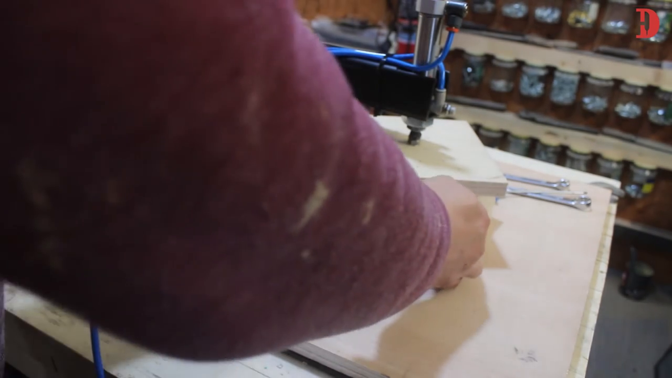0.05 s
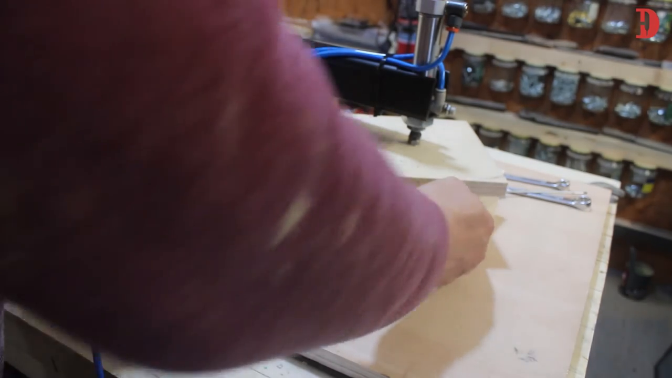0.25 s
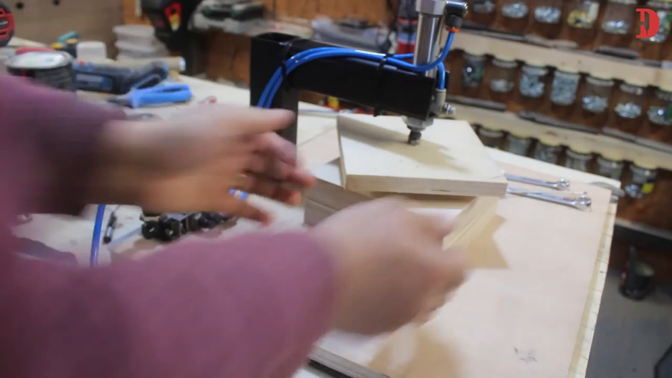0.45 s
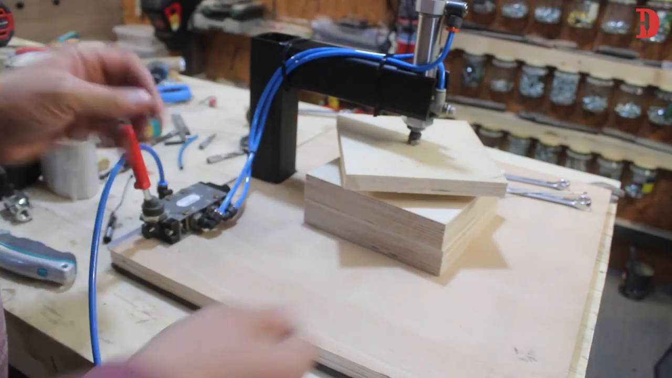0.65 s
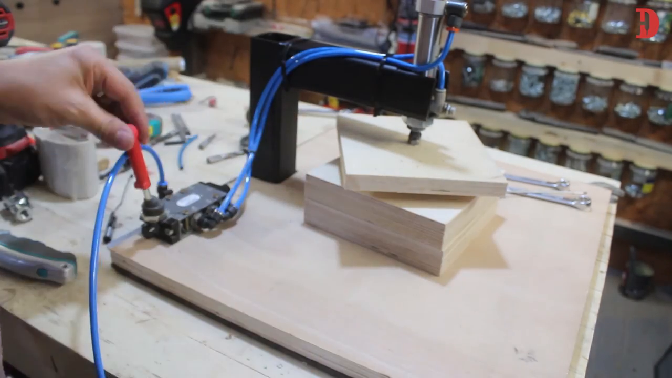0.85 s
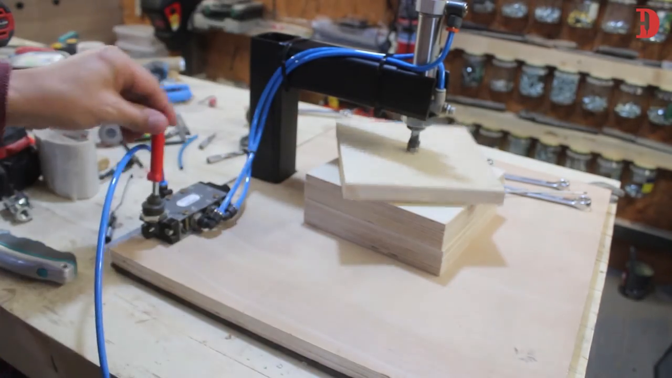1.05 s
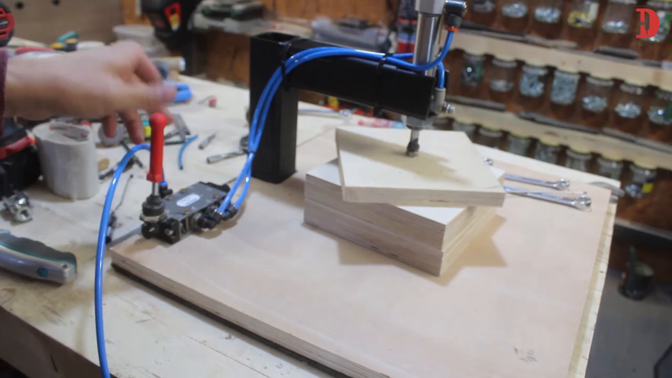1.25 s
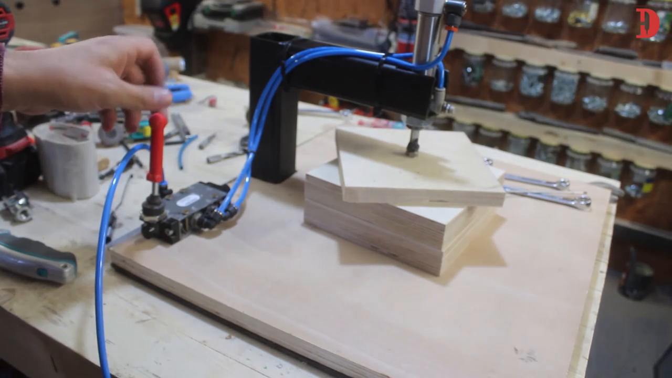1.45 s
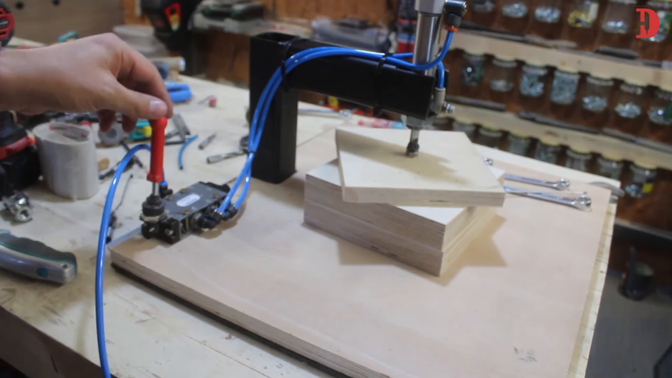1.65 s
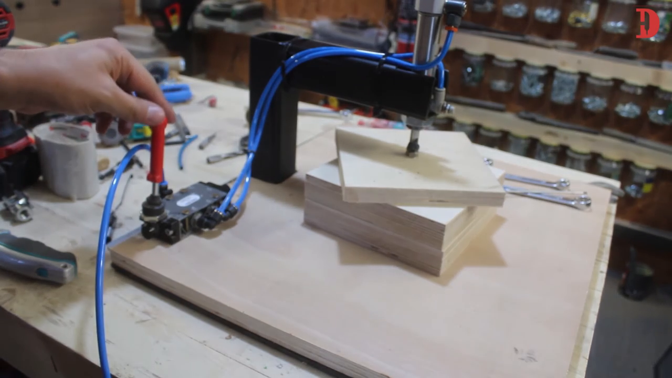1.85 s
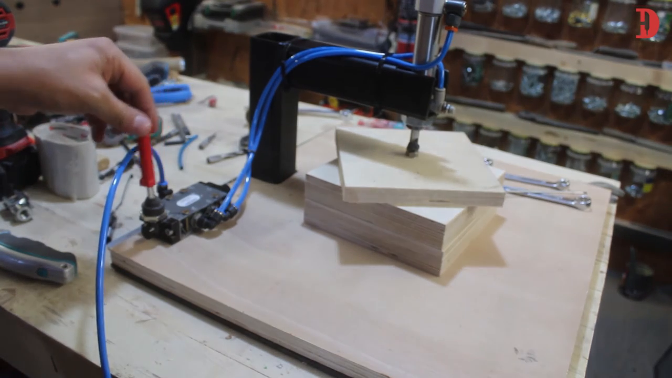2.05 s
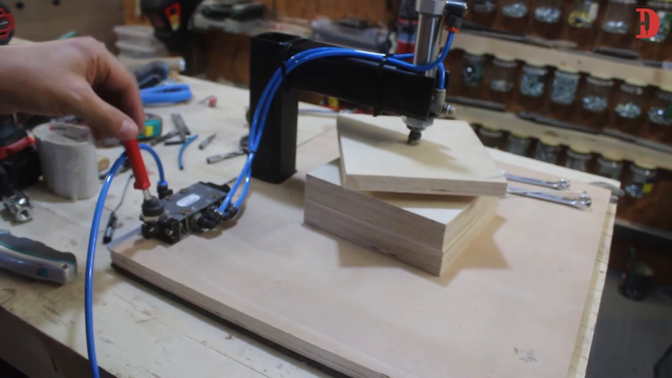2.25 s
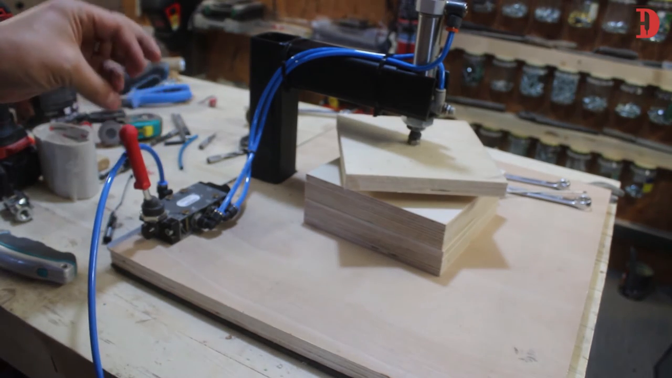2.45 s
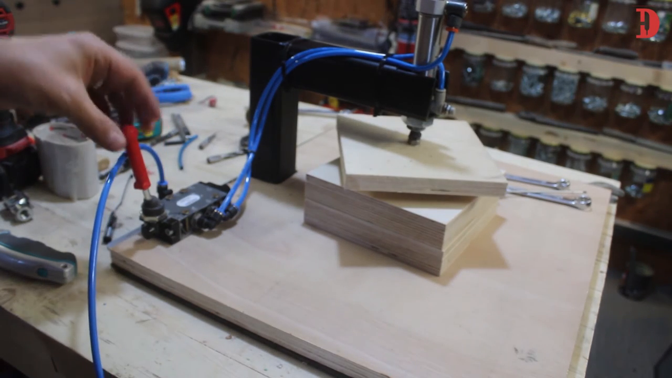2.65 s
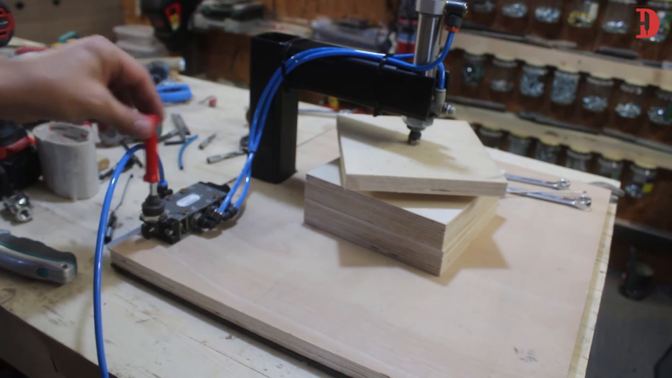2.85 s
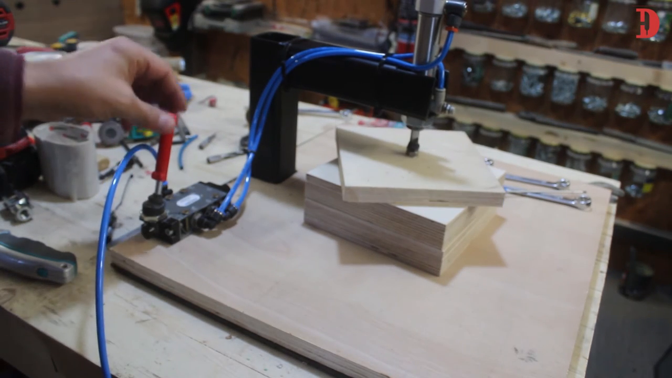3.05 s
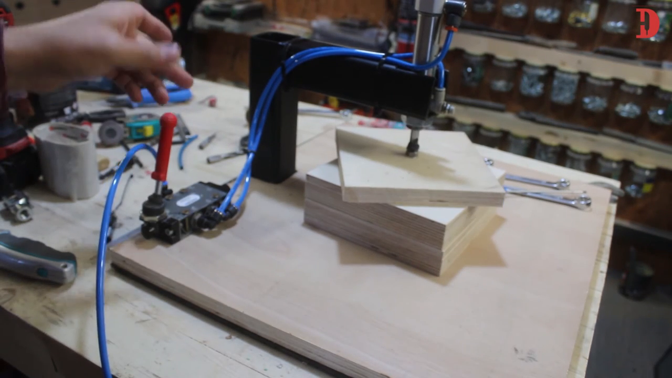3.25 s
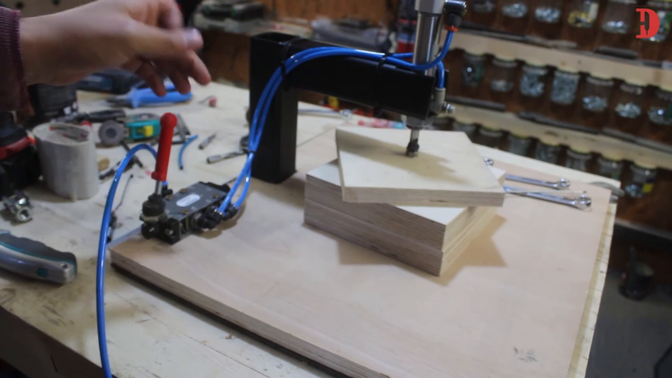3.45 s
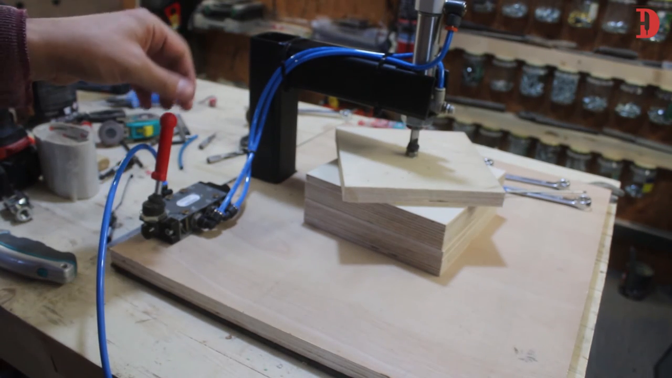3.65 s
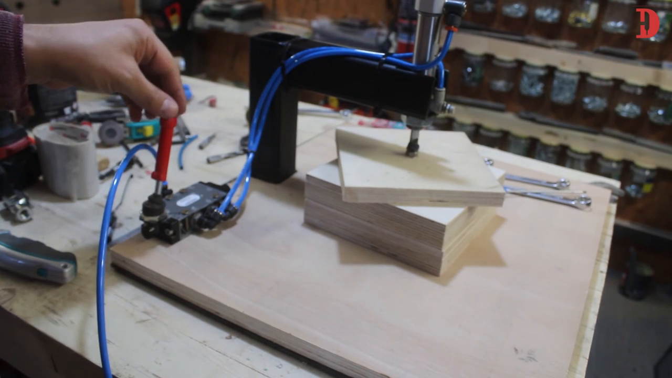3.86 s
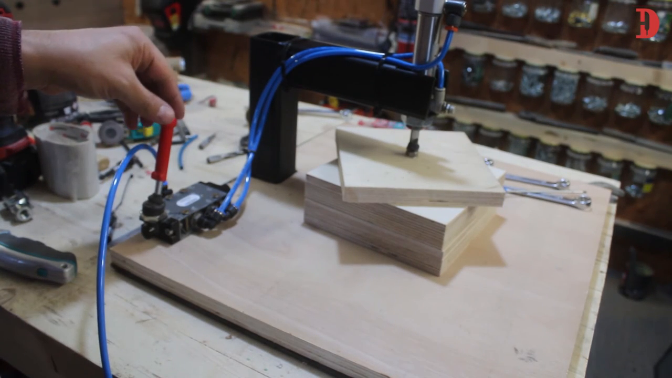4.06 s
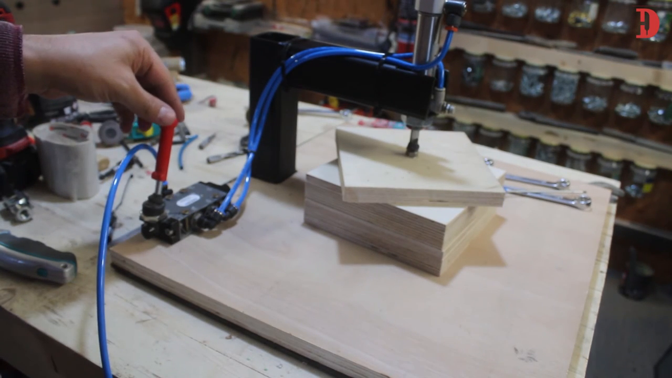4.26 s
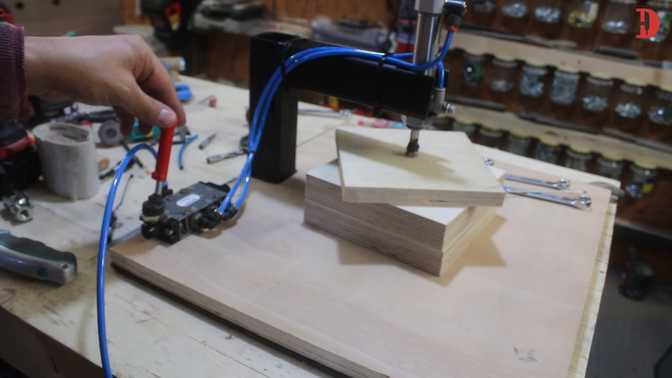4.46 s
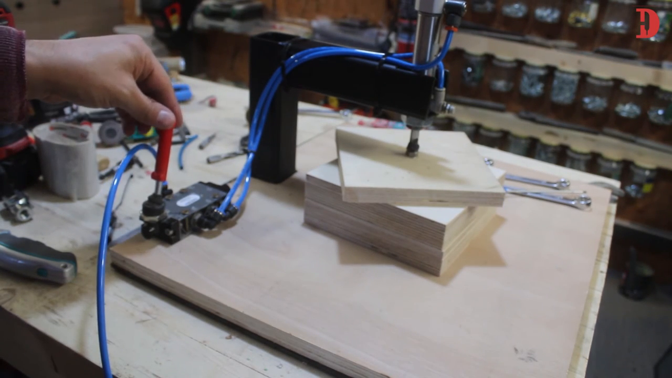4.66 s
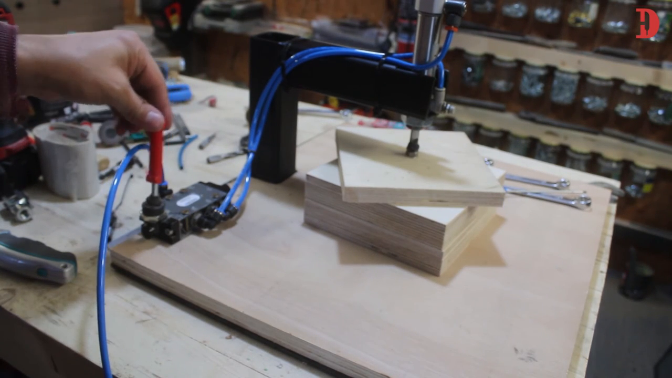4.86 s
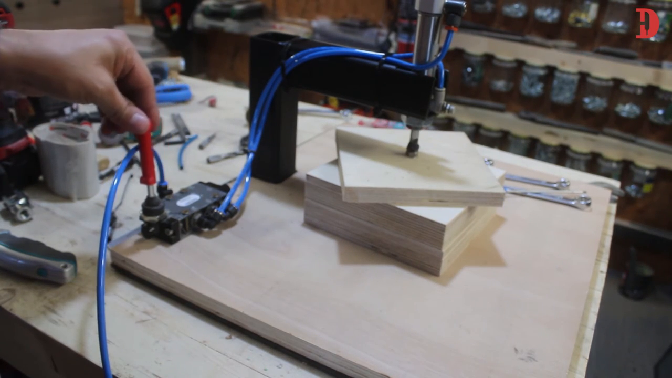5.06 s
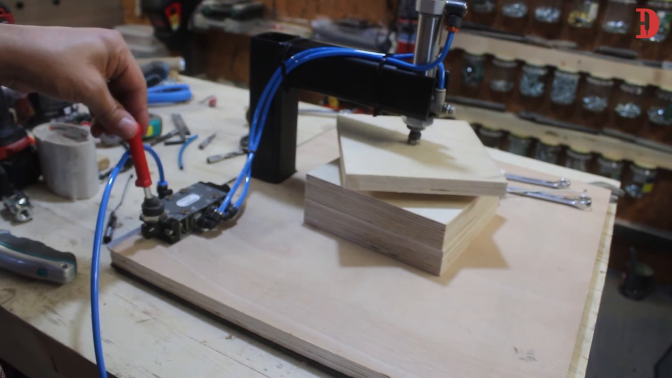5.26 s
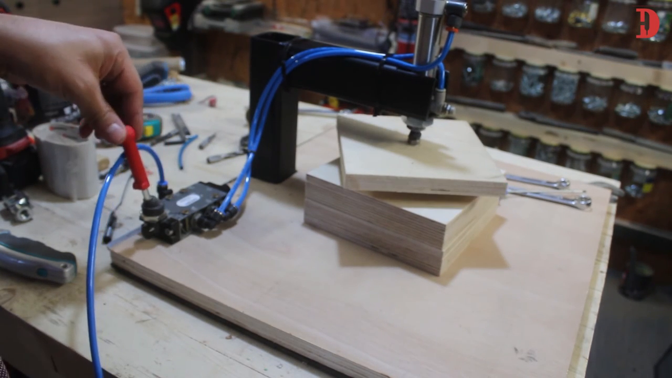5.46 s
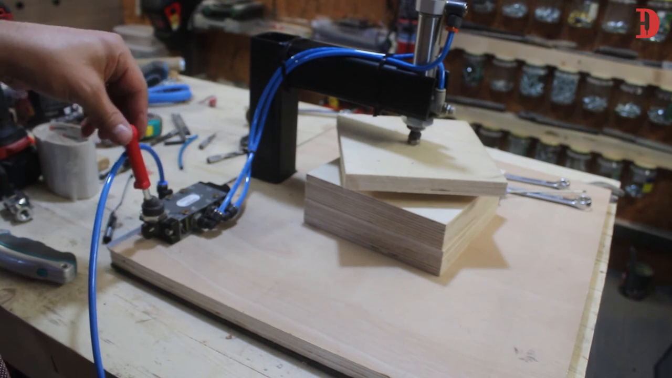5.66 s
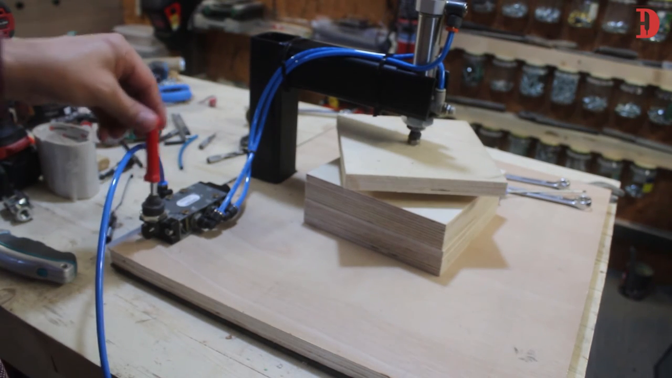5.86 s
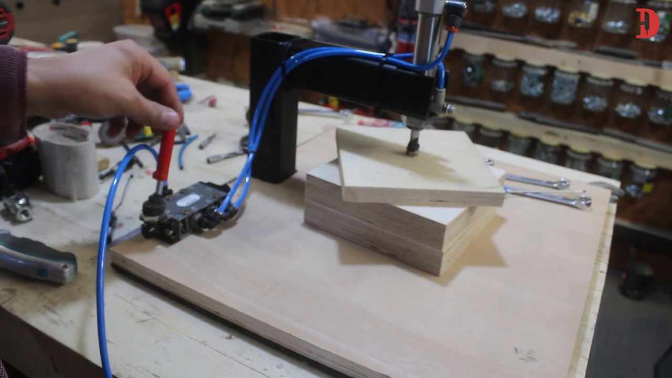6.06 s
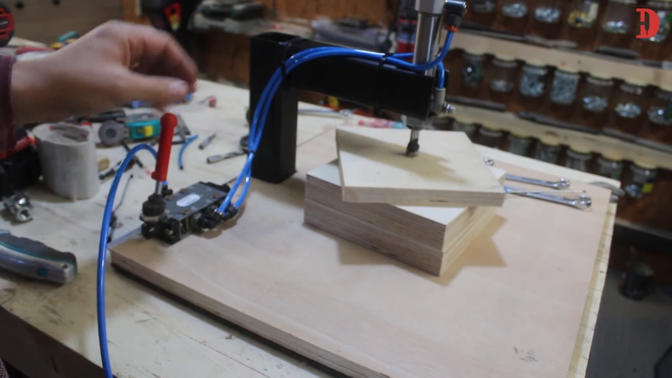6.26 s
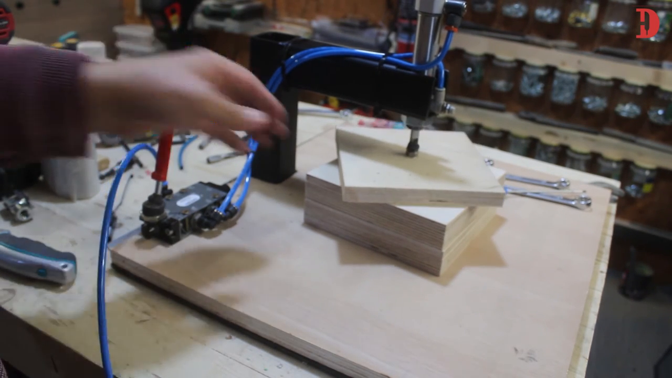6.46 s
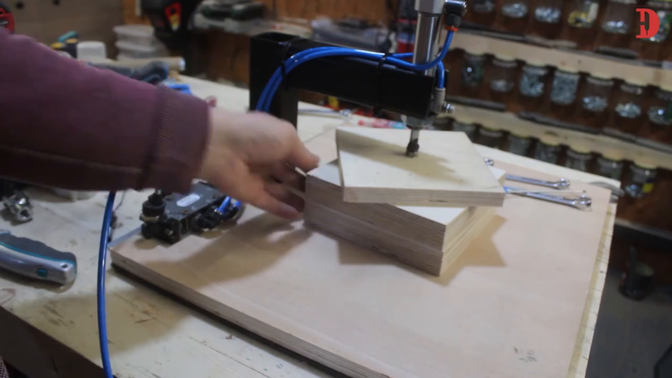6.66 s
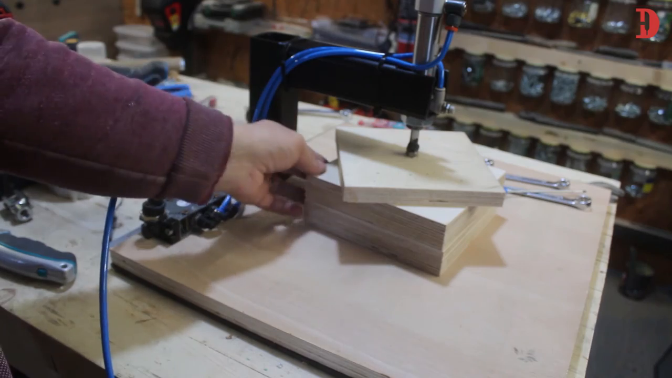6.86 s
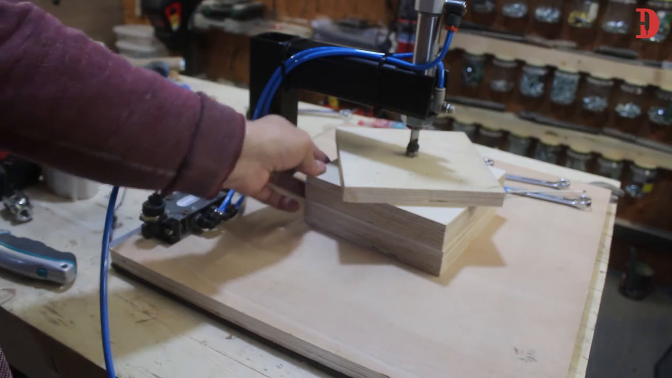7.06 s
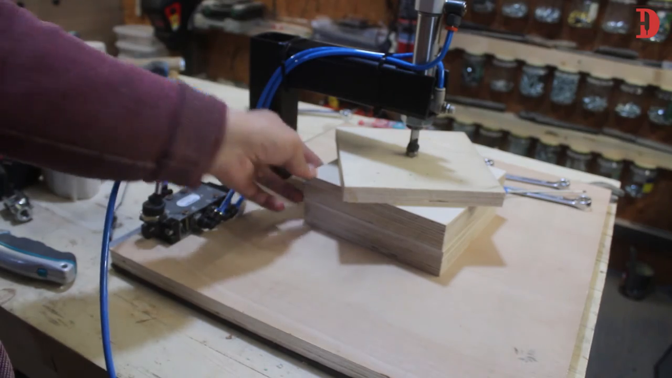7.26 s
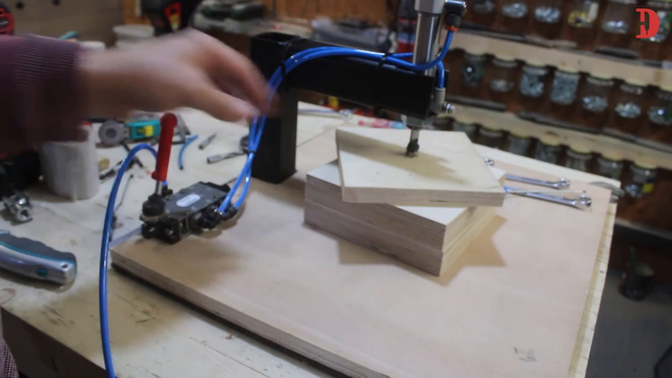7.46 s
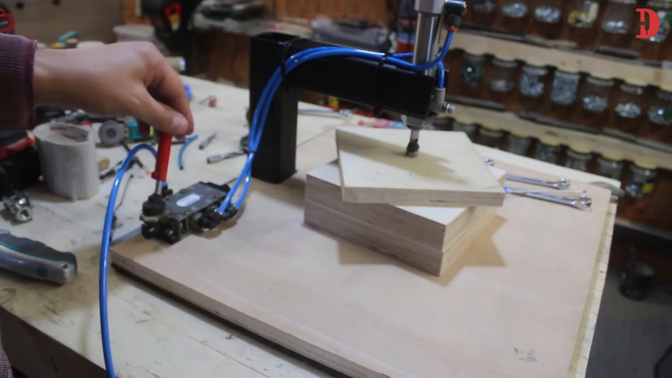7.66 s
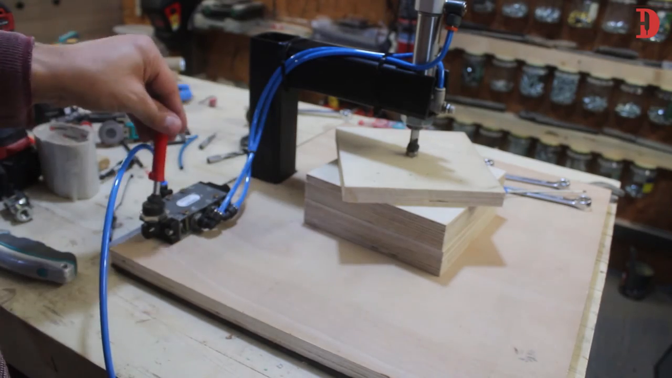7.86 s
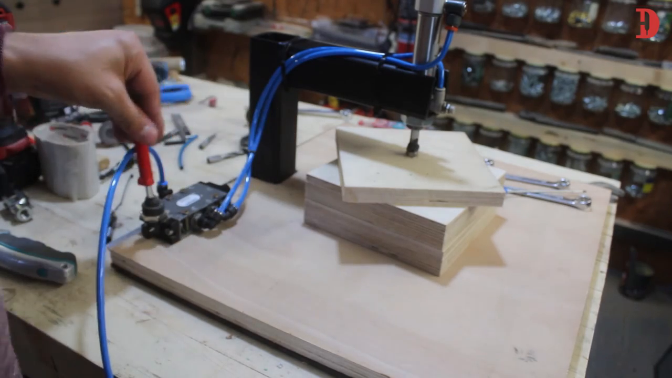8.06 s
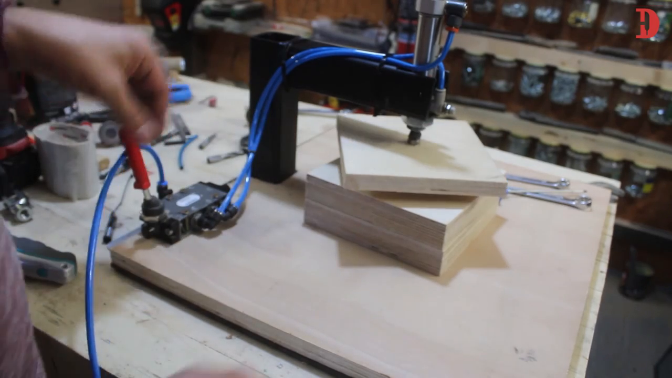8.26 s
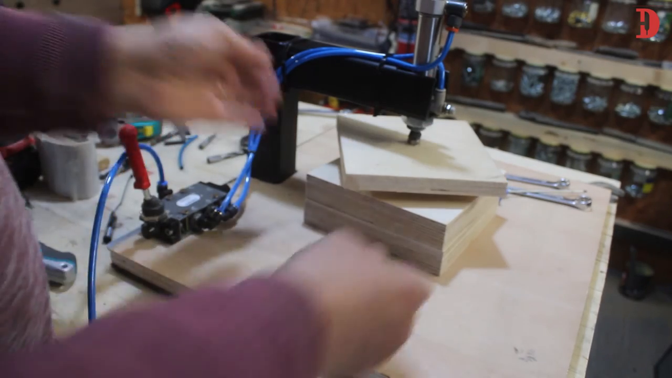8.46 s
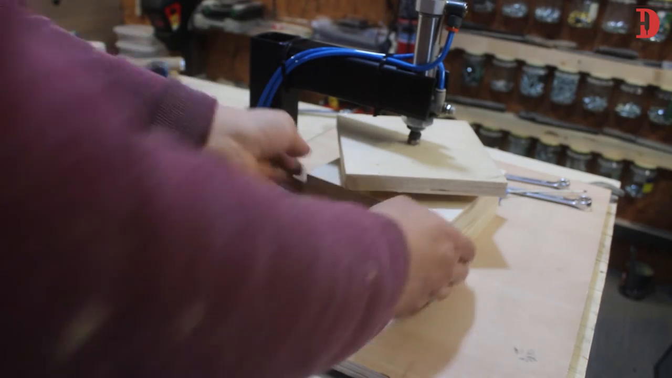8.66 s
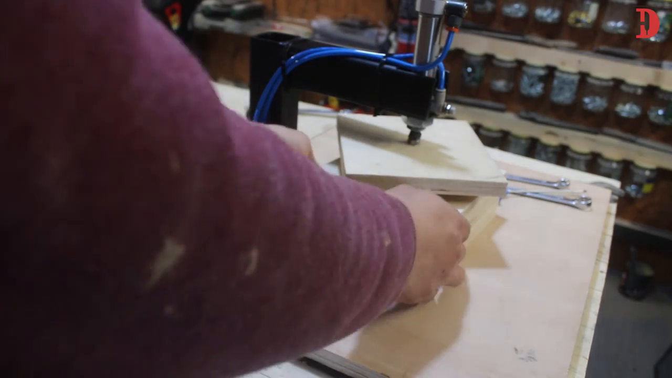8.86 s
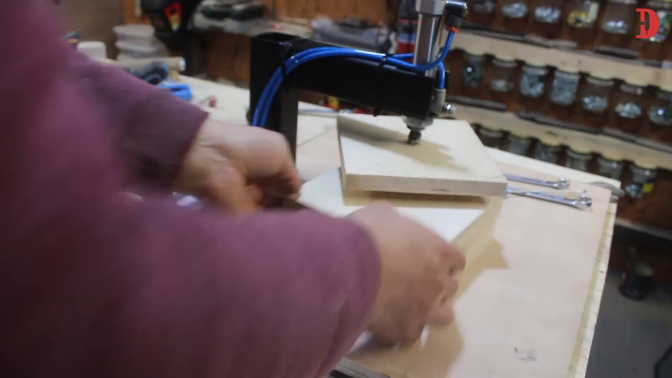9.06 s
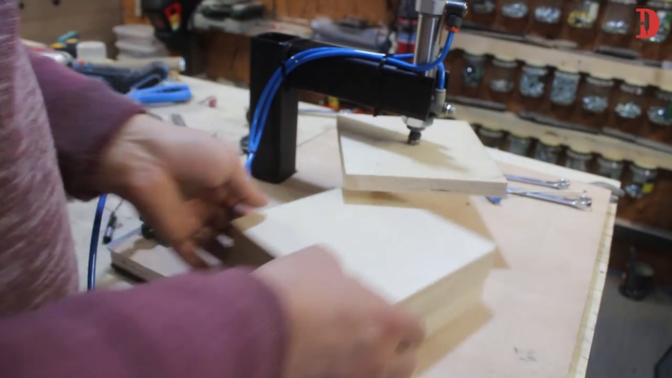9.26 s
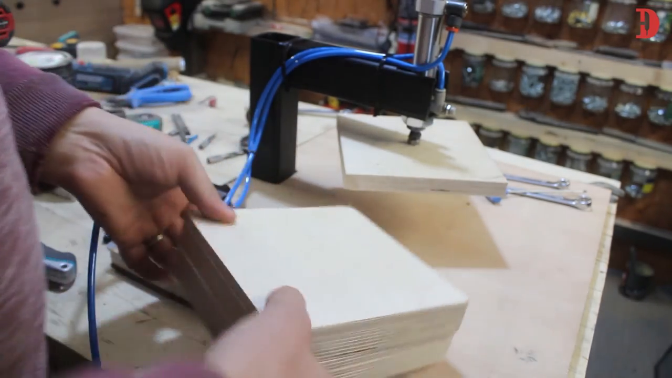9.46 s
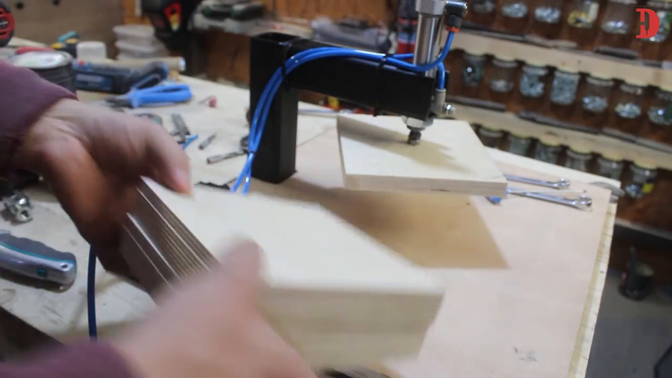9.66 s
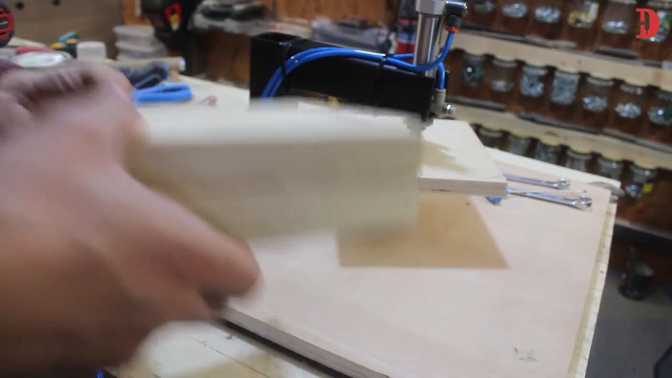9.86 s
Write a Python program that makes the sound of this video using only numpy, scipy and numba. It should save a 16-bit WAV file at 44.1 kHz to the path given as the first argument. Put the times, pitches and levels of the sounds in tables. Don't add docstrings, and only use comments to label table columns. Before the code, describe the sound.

Close on a workshop bench, a steady compressor motor drones behind a small air press. Its hand valve is thrown six times, alternating down and up: explosive air blasts, a popping hiss and dull plywood thud going down, then a hard slam against the stop with thin metallic ringing going up. Sleeve rustles and small ticks fill the gaps. At the end a wood block is dragged off with rough, stuttering scraping.

```python
import sys
import numpy as np
from scipy import signal
from scipy.fft import rfft, irfft
from scipy.io import wavfile
from scipy.ndimage import uniform_filter1d
from numba import njit

SR = 44100
rng = np.random.default_rng(int(sys.argv[2]) if len(sys.argv) > 2 else 0)


def materialize(psi):
    bounded = np.clip(np.atleast_2d(psi).T, -1, 1)
    quanta = np.round(bounded * 32767).astype(np.int16)
    wavfile.write(sys.argv[1], SR, quanta)


def how_loud(loudness_db):
    steps = np.asarray(loudness_db, float) / 20
    return 10 ** steps


N = 437472
TIME = np.arange(N) / SR

# start_s, shaft_hz
SHAFT_RATE = [(0, 56.85), (.45, 56.72), (1.65, 56.72), (2.7, 56.88), (4.6, 57.055), (5.1, 57.02),
              (6.5, 56.89), (7.7, 56.865), (8.6, 56.95), (9.92, 56.98)]
# multiple_of_shaft, level_db
MOTOR_ORDERS = [(1, -26), (2, -20.5), (3, 2), (4, -18), (5, -16.5), (6, -5), (7, -8), (8, -12), (9, -16),
                (10, -14.5), (11, -15), (12, -13), (13, -23.5), (14, -11), (15, -12), (16, -34), (17, -9.5),
                (18, -42.5), (27, -7), (28, -24.5), (29, -10), (30, -23)]
# multiple, rms_db, upright_db, leaning_db, aside_db
CASING = [(19, -52, -26.5, 7, -6), (20, -53, 2.5, 12, -3), (21, -49, 4, -5, 3), (22, -60.5, 10.5, 20, 2.5),
          (23, -57.5, -4.5, -24, 5), (24, -66, -9, 1, 2), (25, -54.5, 0.5, 3, 0), (26, -59, 2.5, -3, -2.5)]
# start_s, upright_0_1, leaning_in_0_1, stepped_aside_0_1
STANCE = [(0, 0.95, 0.14, 0), (.3, 0.64, 0.25, 0.4), (.6, 0.28, 0.99, 0), (.87, 0.12, 0.66, 0),
          (1.3, 0, 0.1, 0), (2.7, 0.04, 0.11, 0), (3.8, 0.05, 0.21, 0.31), (5.3, 0.13, 0.4, 0.36),
          (6.4, 0.68, 0, 0), (7.1, 1, 0.11, 0.2), (8, 0.37, 0.1, 0.1), (8.8, 0.79, 0.08, 0.1),
          (9.7, 0.2, 0.07, 0.95)]
# multiple_of_shaft, rms_db
WHINE = [(33, -65), (113, -69), (122, -67)]
# pitch_hz, rms_db (each multiple)
RATTLE_TONE = [(1700, -75), (2300, -77.5), (4200, -81), (5100, -76), (5700, -78.5), (6900, -77),
               (7500, -81), (8000, -90.5)]
# pitch_hz, level_db (per Hz)
SHOP_TONE = [(20, -33), (60, -4.5), (130, -10), (200, -2), (400, -3), (900, -4), (1700, -7), (3100, -10),
             (4500, -13.5), (7300, -18), (8200, -19), (11000, -29.5), (15000, -40), (16400, -71)]
# start_s, gain_db
GAIN_DRIFT = [(0, -0.5), (1.0, -1.5), (1.55, 3), (2.05, 0.5), (2.7, -0.5), (3.3, -3), (4, 0.5), (5.3, -1),
              (5.8, 2.5), (6.5, 1.5), (7.3, 0), (8.3, -0.5), (8.75, 1.5), (9.7, 2)]

# middle_s, length_s, level_db
BRUSHES = [
    (0.67, 0.88, -46.5),
    (4.825, .05, -63),
    (6.773, 0.076, -50),
    (6.92, 0.091, -50),
    (7.316, 0.086, -47),
    (7.384, 0.062, -48.5),
    (8.95, 0.1, -50),
    (9.8, 0.33, -52.5),
]
# pitch_hz, level_db (per Hz)
CLOTH_TONE = [(2000, -1.5), (5000, -9), (7000, -5.5), (9000, -14.5), (12000, -31.5), (16000, -40.5)]
# start_s, peak_db, centre_hz, width_hz, t60_s
TICKS = [(0.924, -34, 5760, 4980, 0.054), (.967, -40, 2900, 1010, 0.056), (1.012, -44, 7960, 5020, 0.047),
         (1.036, -26.5, 6300, 6000, 0.023), (2.805, -41, 417, 300, 0.17), (2.131, -34, 500, 496, 0.062),
         (2.478, -55, 8000, 4970, 0.047), (2.537, -50, 4500, 4500, 0.06), (2.809, -38.5, 1490, 2480, 0.06),
         (2.845, -44, 2760, 1130, 0.074), (2.883, -42, 7900, 4000, 0.046), (2.935, -33, 402, 500, 0.035),
         (5.241, -18.5, 506, 600, 0.055), (5.345, -26, 3900, 800, 0.043), (5.388, -33, 2500, 900, 0.05),
         (5.405, -29.5, 3900, 1000, 0.05), (5.468, -40, 2500, 900, 0.05), (5.871, -47, 7660, 4200, 0.076),
         (5.929, -27, 390, 500, 0.017), (8.487, -42, 6570, 2600, 0.036), (9.676, -35, 4500, 3500, 0.03),
         (9.686, -41, 6000, 4500, 0.028), (9.884, -46, 8000, 3500, 0.04)]
# start_s, level_db, pitch_hz, t60_s
KNOCKS = [(1.1332, -11, 570, 0.012), (2.984, -27, 450, 0.043), (2.9938, -19.5, 587, 0.0089),
          (5.9962, -23, 603, 0.014), (2.177, -13, 420, 0.08), (2.19, -12, 473, 0.05),
          (5.306, -14, 330, 0.035), (5.312, -11, 398, 0.04), (8.191, -12.5, 940, 0.039),
          (8.198, -11.5, 453, 0.05), (8.208, -12, 403, 0.028)]
# start_s, peak_db
THUMPS = [
    (2.937, -39),
    (5.937, -32),
]

# start_s, level_db, speed_0_1, rasp_hz, extra_dust_db
DRAG = [
    (8.935, -62, 0.1, 2090, 0),
    (8.965, -30, -.6, 2100, -1),
    (9.11, -24.5, 0.42, 1860, 2),
    (9.195, -20, 1, 1820, 0.5),
    (9.29, -21.5, 1, 1810, 2.5),
    (9.35, -18.5, 0.99, 1600, -1),
    (9.5, -24.5, 0.8, 1550, 2.5),
    (9.648, -24, 0.35, 1780, 0.5),
    (9.7, -55, 0.7, 1577, 5),
]
# rest_db, full_speed_db (added), rasp_pitch_db (per octave)
DRAG_MIX = [
    (-4.5, -18.5, -30),
    (-10, 0.5, -1),
    (-14.5, 4, 3),
    (-14, 13.5, 6.5),
    (-18, 7, 9),
    (-40, 29.5, 17),
]
# pitch_hz, width_hz, level_db
BLOCK_MODES = [(206, 59, -4.5), (300, 110, -7), (429, 28, 4), (503, 110, 2), (750, 85, -8)]
# pitch_hz, level_db (per Hz)
DUST_TONE = [(1500, -18), (3500, 4), (4500, -2), (5500, -1), (7000, -3.5), (8500, -8), (9800, -23),
             (12000, -38), (16000, -62)]
# start_s, jolt_db, knock_db
SLIPS = [
    (9.341, -10, -45),
    (9.386, 4, -21),
    (9.433, -2, -26),
    (9.464, -21, -17),
    (9.509, -11, -29),
]
# middle_s, length_s, level_db
LIFTS = [
    (9.384, 0.01, -8),
    (9.392, 0.004, -5),
    (9.43, 0.008, 1),
    (9.49, 0.05, -2),
    (9.54, 0.036, 2),
    (9.19, 0.056, 0.5),
]
# start_s, level_db, rise_ms, t60_s, speed_0_1
NUDGES = [
    (.03, -34, 2.9, 0.67, 0.2),
    (.17, -40.5, 10, 0.67, 0),
    (.24, -47, 8, .3, 0),
    (.325, -58, 5, 0.2, 0),
    (.6, -41.5, 20, 0.52, 0.3),
    (.93, -39.5, 13, 1, 0.3),
    (9.72, -49, 5.4, 0.78, 0.3),
    (9.855, -37, 6, 0.32, 0.25),
    (9.9, -33, 10, .4, 0),
]
# middle_s, length_s, pitch_hz, width_hz, rms_db
CATCHES = [(0.659, 0.18, 795, 300, -44.5), (.27, 0.055, 480, 120, -53.5), (8.979, 0.048, 330, 200, -37),
           (9.03, 0.072, 474, 150, -30.5), (9.098, 0.14, 1690, 900, -32), (9.128, 0.076, 2680, 900, -36),
           (9.21, 0.12, 3840, 400, -31.5), (9.192, 0.07, 2190, 200, -34), (9.195, 0.047, 433, 50, -21.5),
           (9.226, 0.035, 920, 120, -28), (9.237, .05, 437, 50, -29), (9.253, 0.066, 2060, 150, -23.5),
           (9.274, 0.053, 1600, 90, -26), (9.313, 0.053, 1990, 80, -22.5), (9.327, .04, 954, 100, -22),
           (9.338, 0.047, 1240, 90, -22), (9.345, 0.045, 413, 50, -23), (9.352, 0.034, 2070, 80, -23),
           (9.362, 0.052, 2980, 450, -25), (9.376, 0.045, 1594, 60, -27.5), (9.388, 0.012, 430, 200, -17),
           (9.389, 0.036, 2900, 300, -28.5), (9.428, 0.035, 1364, 90, -24),
           (9.436, 0.028, 1000, 110, -21.5), (9.46, 0.027, 1046, 100, -38), (9.488, .04, 983, 60, -24.5),
           (9.522, .04, 1600, 120, -25.5), (9.535, 0.054, 794, 70, -24.5), (9.607, 0.055, 930, 100, -30.5),
           (9.641, .04, 1900, 201, -48), (9.65, 0.025, 760, 300, -33), (1.202, 0.14, 850, 120, -45),
           (1.175, 0.089, 1420, 160, -42), (1.3, 0.17, 4530, 600, -39), (9.676, 0.04, 1500, 1500, -44)]

# pitch_hz, level_db, swell_s, t60_s, part (0 ram, 1 frame, 2 plate, 3 pin, 4 collar)
STEEL_MODES = [(3994, -43, .2, .75, 2), (5306, -64, .2, 3, 0), (5766, -49, .29, 2.2, 0),
               (6792, -39, .13, .7, 0), (7608, -31, .15, .4, 0), (8394, -46, .1, 1.7, 1),
               (10260, -40, .05, .45, 1), (10520, -57, .06, 2, 3), (10495, -47, .075, .45, 4),
               (11350, -45, .09, .4, 4), (13440, -61, .09, .45, 0), (14700, -68, .07, .4, 0)]
# ram_db, frame_db, plate_db, pin_db, collar_db
SHAKES = [
    (6.5, -1.5, -3, 0, 2),
    (2.5, -4.5, 7.5, -23.5, -2),
    (-2.5, -17, -4, -19.5, 1),
]
# start_s, peak_db, crack_db (above 1 kHz, relative), rumble_t60_s
BLOWS = [
    (1.1325, -20, -8, 0.25),
    (2.1734, -4.5, 2, 0.24),
    (2.9921, -26, -10, 0.3),
    (5.2905, -2.5, 4, 0.22),
    (5.994, -26.5, -2, 0.47),
    (8.185, -2.5, 0, 0.21),
]
# pitch_hz, level_db, t60_s
BENCH_MODES = [(190.7, 0, 0.64), (330, 14.5, 0.024), (491.6, 3, 0.43), (545, -6, 0.97), (713, 2.5, 0.35),
               (1232, 3, 0.26), (1550, -17.5, 0.073), (1600, -20, 0.23), (1943, 4, 0.18), (2260, -25, 0.94),
               (2650, -24.5, 0.1)]
# pitch_hz, level_db, t60_s
CONTACT_MODES = [(1780, -2, 0.019), (2900, -10, 0.016), (742, -8.5, 0.015)]
# pitch_hz, level_db (per Hz)
CRACK_TONE = [(200, -36.5), (600, 2.5), (1000, 2.5), (1800, 1), (3000, 0), (4000, -11), (7000, -11),
              (9000, -14), (16000, -42)]
# pitch_hz, level_db (per Hz)
BENCH_TAIL_TONE = [(29, -48), (50, -52), (178, -3.5), (426, 6.5), (532, 6), (676, 1.5), (1040, -4.5),
                   (1130, -43), (1250, 6), (1410, -13.5), (3000, -9), (3900, -13), (6600, -120)]

# start_s, level_db
POPS = [
    (1.0845, -8.5),
    (2.9425, 2.5),
    (5.9405, -8),
]
# pitch_hz, level_db, t60_s
TUBE_MODES = [(2200, 0, .028), (2600, -17, .05), (4300, -6, .022), (7300, -14, .025)]
# start_s, peak_db, rise_ms, t60_s
DOWN_BLASTS = [(1.07, -35, 3.7, 0.3), (1.082, -0.5, 1.1, 0.087), (1.086, -3, 0.83, 0.065),
               (1.095, -12, 1.2, 0.028), (2.928, -36, 4, 0.28), (2.939, 10.5, 3.4, 0.041),
               (2.949, -6, 1.3, 0.061), (5.926, -37.5, 4, 0.37), (5.937, 7, 2.7, 0.059),
               (5.9456, -4.5, 1, 0.025), (5.9497, -11.5, 1, 0.05)]
# start_s, peak_db, rise_ms, t60_s
UP_BLASTS = [(2.133, -10, 1.4, 0.1), (2.136, 3, 1.24, 0.11), (2.148, -9, 1.4, 0.064), (5.215, -37, 5, 0.4),
             (5.237, -9, 4.8, 0.14), (5.246, 4.5, 2.9, 0.076), (5.257, -7, 2.1, 0.098),
             (5.268, -1.5, 3, 0.1), (5.279, -12, 2.5, 0.07), (8.142, -7, 2, 0.092),
             (8.147, 3.5, 1.35, 0.093), (8.157, -7.5, 2.2, 0.09)]
# pitch_hz, level_db (per Hz)
DOWN_TONE = [(300, -26), (1500, -23.5), (2200, -3), (2900, -9.5), (3500, -11), (4400, -3.5), (5300, -15.5),
             (6100, 3), (7500, 0), (9000, -9.5), (10500, -10.5), (12000, -14.5), (13500, -31.5),
             (16500, -45)]
# pitch_hz, level_db (per Hz)
UP_TONE = [(300, -24.5), (1300, -29), (2000, -9), (2800, -7), (3500, -19.5), (4600, -6.5), (5400, -8.5),
           (6200, 3), (7400, -0.5), (8600, -12), (10000, -17), (11500, -24), (13500, -42), (16500, -50)]
# (below 3 kHz, relative)
VENTS = [
    (1.105, -35, 1.373, -36, 56, -0.5),
    (2.965, -30, 3.22, -35, 63, -11),
    (5.965, -31, 6.257, -34.5, 48, -15),
]
# pitch_hz, level_db (per Hz)
VENT_TONE = [(2000, -8), (3300, -11), (4000, -2.5), (4600, -1.5), (5400, -11), (6000, 1.5), (6900, -1.5),
             (8000, -11), (9500, -12), (10500, -15.5), (11500, -9), (13300, -23), (13650, -62.5),
             (15000, -93)]
# middle_s, length_s, hiss_db, jet_db
SURGES = [
    (1.292, 0.22, 4.5, 3),
    (3.164, 0.13, 3, 12),
    (6.19, .18, 0.5, -7),
]
# pitch_hz, width_hz, level_db
HOSE_MODES = [(2250, 58, -24), (2520, 28, -16.5), (2885, 40, -13), (3110, 43, -15), (3380, 62, -23),
              (4100, 70, -16), (4420, 44, -10), (4735, 90, -7.5), (5895, 59, -5), (6580, 66, -11.5),
              (7520, 60, -13), (8420, 110, -16)]
# start_s, level_db, rise_ms, t60_s
SIGHS = [
    (2.24, -28, 12, 0.39),
    (5.31, -29.5, 6.3, 0.47),
    (8.2, -31, 10, 0.37),
    (2.275, -42, 12, 0.3),
    (8.27, -37.5, 10, 0.23),
]
# pitch_hz, level_db (per Hz)
SIGH_TONE = [(1500, -20), (3500, -2), (5000, 0), (6800, -1), (8500, -0.5), (10000, -12), (12500, -18),
             (15000, -40)]
# start_s, level_db, rise_ms, t60_s
WHISTLES = [
    (1.086, -15, 2, 0.12),
    (2.95, -33, 4, 0.18),
    (5.943, -14.5, 2.7, 0.12),
]


def unit(x):
    return x / np.sqrt(np.mean(x ** 2))


def noise():
    return rng.standard_normal(N)


def colour(x, points):
    hz, db = np.transpose(points)
    size = 4096
    grid = np.linspace(1, SR / 2, size // 2 + 1)
    cep = irfft(np.log(how_loud(np.interp(np.log(grid), np.log(hz), db))))
    cep[1:size // 2] *= 2
    cep[size // 2 + 1:] = 0
    taps = irfft(np.exp(rfft(cep)))
    return signal.fftconvolve(x, taps / np.sqrt(np.sum(taps ** 2)))[:len(x)]


@njit
def svf(x, hz, width):
    y, b, l = np.empty(len(x)), 0., 0.
    for i in range(len(x)):
        g, k = np.tan(np.pi * hz[i] / SR), width / hz[i]
        v = (b + g * (x[i] - l)) / (1 + g * (g + k))
        b, l, y[i] = 2 * v - b, l + 2 * g * v, k * v
    return y


@njit
def hold(db, release):
    y, e = np.empty(len(db)), 0.
    for i in range(len(db)):
        e = max(db[i], e * (1 - release))
        y[i] = e
    return y


def band(x, hz, width_hz):
    return svf(x, hz + np.zeros(len(x)), 1. * width_hz)


def two_bands(x, hz, width_hz, then_hz, then_width_hz):
    return unit(band(band(x, hz, width_hz), then_hz, then_width_hz))


def cut(x, hz, kind="low", order=8):
    return signal.sosfilt(signal.butter(order, hz, kind, fs=SR, output="sos"), x)


def walk(rate):
    k = int(SR / rate)
    steps = np.repeat(rng.standard_normal(N // k + 1), k)
    return unit(uniform_filter1d(uniform_filter1d(steps, k), k)[:N])


def read(rows):
    s, *columns = np.transpose(rows)
    return [np.interp(TIME, s, c) for c in columns]


def puff(s, db, rise_ms, t60):
    t = np.maximum(TIME - s, 0)
    return how_loud(db - 60 * t / t60) * (1 - np.exp(-1000 * t / rise_ms)) ** 2


def puffs(rows):
    return sum(puff(*row) for row in rows)


def bell(s, length, t=TIME):
    return np.exp(-(2 * (t - s) / length) ** 2)


def ring(modes, s, db, damp=0.56):
    t, tone, out = TIME[:int(1.5 * SR)], 0, np.zeros(N)
    chance = rng.standard_normal(len(modes))
    for k, ((hz, mode_db, t60), c) in enumerate(zip(modes, chance)):
        strength = (1 + 0.29 * c) * (-1) ** k
        tone = tone + strength * how_loud(mode_db - 60 * t / (t60 * damp)) * np.sin(2 * np.pi * hz * t)
    at = int(s * SR)
    out[at:at + len(t)] = how_loud(db) * tone[:N - at]
    return out


def room(x):
    t = TIME[:SR]
    low = band(band(rng.standard_normal(SR), 410, 1830), 1100, 7500)
    top = band(band(band(rng.standard_normal(SR), 6600, 12000), 4100, 7000), 4700, 6500)
    low, top = low * how_loud(-60 * t / 0.58), top * how_loud(-60 * t / 0.36)
    tail = cut(1.37 * low + top, 11500, order=2) * np.minimum(t / 0.013, 1)
    return signal.fftconvolve(x, tail / np.sqrt(np.sum(tail ** 2)))[:N]


def rattle(turn):
    k = np.arange(31, 140)
    scatter, *phase = rng.standard_normal((len(k), 3)).T
    hz, db = np.transpose(RATTLE_TONE)
    level_db = np.interp(np.log(57 * k), np.log(hz), db) + 2.5 * scatter
    lines = np.zeros(4097, complex)
    lines[k] = how_loud(level_db) * np.exp(1j * np.arctan2(*phase))
    cycle = irfft(lines) * 4096 * np.sqrt(2)
    return np.interp(turn / (2 * np.pi) % 1, np.arange(len(cycle)) / len(cycle), cycle, period=1)


def motor():
    (hz,), (upright, leaning, aside) = read(SHAFT_RATE), read(STANCE)
    turn = 2 * np.pi * np.cumsum(hz) / SR
    hum = np.zeros(N)
    for (k, db), phase in zip(MOTOR_ORDERS, 2 * np.pi * rng.random(len(MOTOR_ORDERS))):
        hum += how_loud(-53 + db + 0.96 * walk(3.11)) * np.sqrt(2) * np.sin(k * turn + phase)
    smear = 1.25 * (1 - np.clip(np.maximum(upright, aside), 0, .75))
    for k, db, up_db, in_db, side_db in CASING:
        stance_db = up_db * upright + in_db * leaning + side_db * aside
        tone = np.sin(round(k) * turn + smear * (round(k) - 21) ** 2)
        hum += how_loud(db + stance_db + 0.259 * walk(2.8)) * np.sqrt(2) * tone
    for k, db in WHINE:
        hum += how_loud(db + 3 - 7 * upright + 2 * walk(1)) * np.sin(k * turn)
    clatter = rattle(turn)
    for centre_hz in 1900 * 1.3 ** np.arange(7):
        hum += how_loud(1 + 1.6 * walk(1.2) - 4 * leaning) * band(clatter, centre_hz, .3 * centre_hz)
    return hum


def shop():
    leak = unit(band(noise(), 7600 * (1 + 0.0302 * walk(.7)), 650))
    leak = how_loud(-65.5 + 2.8 * walk(2.4)) * leak
    return motor() + leak + how_loud(-48.5 + .5 * walk(1.7)) * colour(noise(), SHOP_TONE)


def sleeve():
    strokes = sum(how_loud(db) * bell(s, length) for s, length, db in BRUSHES)
    return strokes * how_loud(1.2 * walk(73)) * colour(noise(), CLOTH_TONE)


def ticks():
    clicks = 0
    for s, db, hz, wide_hz, t60 in TICKS:
        clicks = clicks + two_bands(noise(), hz, wide_hz, hz, wide_hz) * puff(s, db + 0.5, 0.42, 0.61 * t60)
    knocks = sum(ring([(hz, 0, t60)], s, db, damp=0.78) for s, db, hz, t60 in KNOCKS)
    thumps = sum(puff(s, db, rise_ms=1.8, t60=0.037) for s, db in THUMPS)
    return clicks + cut(knocks, 190, "high", order=2) + thumps


def block_body(grains, modes):
    return unit(band(sum(how_loud(db) * band(grains, hz, wide_hz) for hz, wide_hz, db in modes), 370, 310))


def drag():
    db, speed, hz, dust_db = read(DRAG)
    grains = unit(noise() * how_loud(2.6 * rng.exponential(size=N)) * how_loud(1.5 * walk(150)))
    slips = 1 + sum(puff(s, jolt_db, 0.62, 0.027) for s, jolt_db, _ in SLIPS)
    slips = slips * how_loud(sum(lift_db * bell(s, length) for s, length, lift_db in LIFTS))
    slips = slips * (TIME > DRAG[0][0]) * (TIME < DRAG[-1][0])
    low, high = block_body(grains, BLOCK_MODES[:2]), block_body(grains, BLOCK_MODES[2:])
    board = two_bands(grains, 1000 * (1 + 0.046 * walk(6.3)), 400, 770, 800)
    rasp = band(grains, hz * (1 + 0.091 * walk(25)), 870) + .5 * band(grains, 2940, 820)
    rasp = two_bands(rasp, 1820, 2300, 2400, 4400)
    dust = how_loud(dust_db) * colour(grains, DUST_TONE)
    chatter = unit(band(grains, 415.5, 9.7))
    nudges = [(puff(*row), pace) for *row, pace in NUDGES]
    knocks = sum(puff(s, knock_db, 1.0, 0.063) for s, _, knock_db in SLIPS)
    out = band((low + how_loud(-16.0) * high) * knocks, 350, 500)
    layers = (low, high, -board, rasp, dust, chatter)
    for (rest_db, fast_db, short_db), layer in zip(DRAG_MIX, layers):
        gain_db = db + fast_db * speed + short_db * np.log2(hz / 1800) + 0.9 * walk(38)
        gain = slips * how_loud(gain_db) + sum(e * how_loud(fast_db * pace) for e, pace in nudges)
        out = out + how_loud(rest_db) * gain * layer
    return out


def catches():
    out = np.zeros(N)
    for s, length, hz, wide_hz, db in CATCHES:
        at = int((s - .15) * SR)
        t = TIME[at:][:13000]
        grit = rng.standard_normal(13000) * how_loud(2.5 * rng.exponential(size=13000))
        tone = two_bands(grit, hz, wide_hz, hz, 3 * wide_hz)
        out[at:at + len(t)] += how_loud(db) * tone * bell(s, length, t)
    return out


def steel():
    out = np.zeros(N)
    for (s, *_), shake_db in zip(BLOWS[1::2], SHAKES):
        at = int(s * SR)
        t = TIME[:N - at][:3 * SR]
        for hz, db, swell, t60, part in STEEL_MODES:
            waver_db = 0.8 / t60 * walk(30)[:len(t)]
            level = how_loud(db + shake_db[part] + 5 - 60 * t / t60 + waver_db)
            rise = 1 - np.exp(-(t / swell) ** (2 + (t60 < .6)))
            out[at:at + len(t)] += level * rise * np.sin(2 * np.pi * hz * t)
    return out


def ram():
    out = 0
    for s, db, crack_db, rumble_s in BLOWS:
        crack = puff(s, 0, rise_ms=0.24, t60=0.044) + puff(s + 0.0046, -5.5, rise_ms=0.9, t60=0.055)
        out = out + ring(BENCH_MODES, s, db - 14.5, damp=1.19 * rumble_s)
        out = out + ring(CONTACT_MODES, s, db + crack_db)
        out = out + how_loud(db + crack_db - 7.5) * colour(noise() * crack, CRACK_TONE)
        out = out + colour(noise() * puff(s, db - 13.5, rise_ms=0.45, t60=rumble_s), BENCH_TAIL_TONE)
        floor = two_bands(noise(), 91.7, 91, 130, 120)
        legs = unit(cut(band(noise(), 287, 204), 2000, order=2))
        out = out + floor * puff(s, db - 35.5, rise_ms=50, t60=0.86)
        out = out + legs * puff(s, db - 24.0, rise_ms=38, t60=3.4 * rumble_s)
    return cut(out, 65, "high", order=2)


def pops():
    tube = sum(ring(TUBE_MODES, s, db) for s, db in POPS)
    return cut(band(tube, 2600, 3500), 1700, "high", order=4)


def venting(s, gush_db, end_s, db, sag_db):
    before, after = np.maximum(end_s - TIME, 0), np.maximum(TIME - end_s, 0)
    push_db = db + 12 * before - sag_db * after - 148 * after ** 2
    return puff(s, gush_db, rise_ms=2.1, t60=0.14) + (TIME > s) * how_loud(push_db)


def exhaust(flow):
    port = how_loud(-9 + 1.8 * walk(36)) * two_bands(noise(), 6030, 150, 6030, 3015)
    hiss = colour(noise(), VENT_TONE) + port
    jet = two_bands(noise(), 2500 * (1 + 0.086 * walk(17)), 1700, 3200, 2700)
    hose = sum(how_loud(db + 1.5 * walk(14)) * unit(band(flow, hz, wide_hz)) for hz, wide_hz, db in HOSE_MODES)
    sigh = how_loud(-4.5) * colour(flow, SIGH_TONE) + how_loud(-11.5) * jet
    out = puffs(SIGHS) * cut(sigh, 11800, order=3)
    for (*row, jet_db), (s, length, hiss_surge_db, jet_surge_db) in zip(VENTS, SURGES):
        surge = bell(s, length)
        air = how_loud(hiss_surge_db * surge) * (how_loud(-7.5) * hiss + how_loud(-5.5) * hose)
        air = air + how_loud(jet_db - 10.0 + jet_surge_db * surge) * jet
        out = out + venting(*row) * air
    return cut(how_loud(0.72 * walk(30)) * out, 13100, order=20)


def valve():
    rough = how_loud(1.2 * walk(500))
    down = colour(noise() * rough * puffs(DOWN_BLASTS), DOWN_TONE)
    up = colour(noise() * rough * puffs(UP_BLASTS), UP_TONE)
    flow = noise()
    whistle = puffs(WHISTLES) * two_bands(flow, 6030, 520, 6030, 900)
    return whistle + how_loud(-6.5) * (down + up) + exhaust(flow)


def scene():
    near = valve() + ram() + ticks() + drag() + catches()
    near = near + how_loud(-18.5) * room(near)
    loud_db = 10 * np.log10(uniform_filter1d(near ** 2, size=2601, origin=1300) + 1e-12)
    duck_db = hold(1.9 * np.maximum(loud_db + 19, 0), 1 / (.44 * SR))
    background = how_loud(read(GAIN_DRIFT)[0] - duck_db) * shop()
    return (near + pops() + sleeve() + steel() + background)[None]


def roll_off(x):
    return signal.sosfilt(signal.butter(12, 15400, fs=SR, output="sos"), x)


def record(dry):
    mix = np.clip(dry, -1, 1)
    return roll_off(mix)


dry = scene()
out = record(dry)
materialize(out)
```